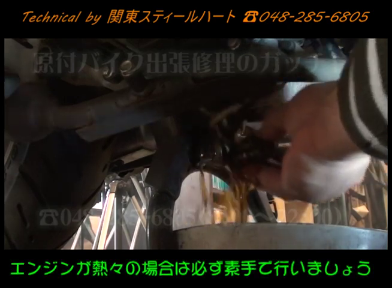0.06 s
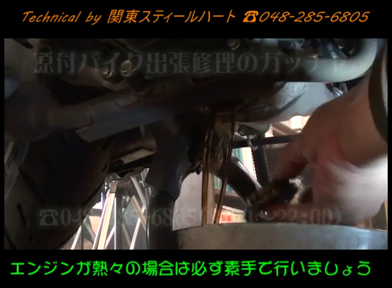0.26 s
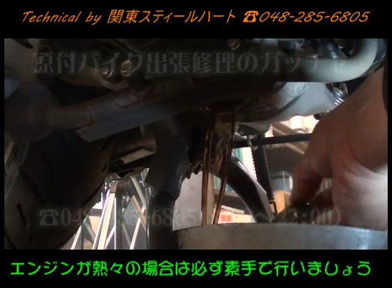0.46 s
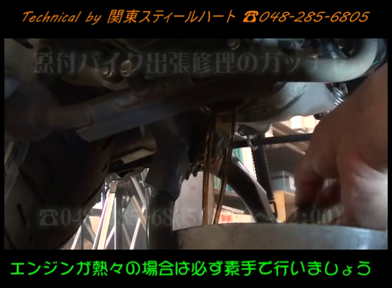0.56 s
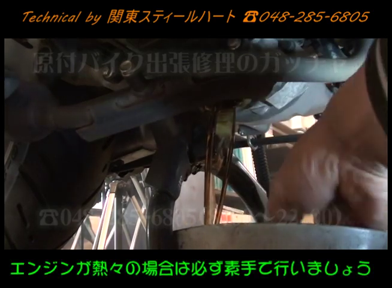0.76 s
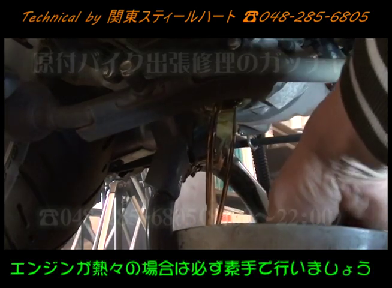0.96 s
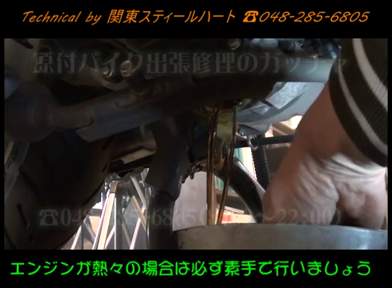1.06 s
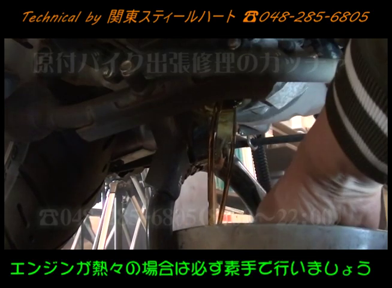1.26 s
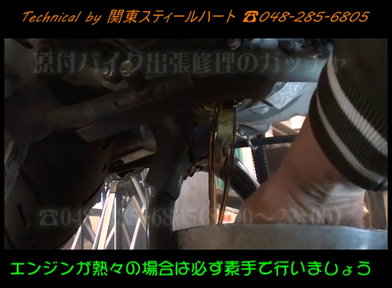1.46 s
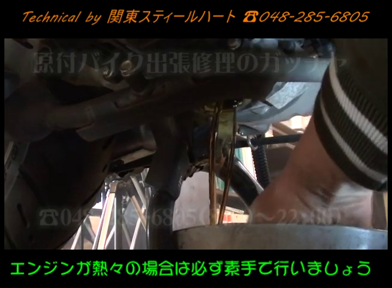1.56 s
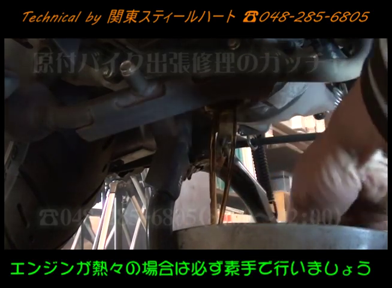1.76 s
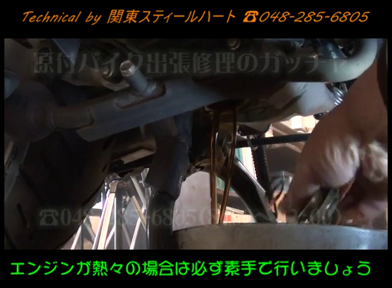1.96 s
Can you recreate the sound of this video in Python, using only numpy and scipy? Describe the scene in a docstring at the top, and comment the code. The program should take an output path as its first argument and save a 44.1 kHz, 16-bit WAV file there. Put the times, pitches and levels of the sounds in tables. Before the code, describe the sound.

A small metal plug clatters into a metal oil bowl after a few light clicks, followed by damped knocks, gritty scraping and a dull bump. The microphone is close, with soft running oil and low workshop rumble behind.

```python
"""A drain plug clicks and squeaks in oily fingers, drops into a metal oil bowl and rattles to rest,
each bounce ringing the bowl and its thin wall. A hand then knocks the plug against the wall,
damping the ring, and drags it along the bottom in a stream of gritty slips; a dull bump follows.
Under it all, oil runs quietly over a low rumble in a small workshop, heard close up through a limiter."""
import sys
import numpy as np
from scipy import signal
from scipy.fft import rfft, irfft
from scipy.io import wavfile
from scipy.ndimage import uniform_filter1d

SR = 44100
rng = np.random.default_rng(int(sys.argv[2]) if len(sys.argv) > 2 else 0)


def output_pcm(signal):
    """Save a mono or channel-first signal as 16-bit PCM at the path in sys.argv[1].

    Samples are clipped to [-1, 1] before scaling.
    """
    pcm = np.clip(np.atleast_2d(signal).T, -1, 1) * 32767
    wavfile.write(sys.argv[1], SR, np.round(pcm).astype(np.int16))


N = 88200
T = np.arange(N) / SR

# Ringing tones of the bowl and its close reflections:
# f/Hz, t60/s, then level/dB when dropped on, knocked and scraped
RING_TONES = [(778.6, 0.064, -11.5, 1, -6.5), (872, 0.095, -15, -4.5, -4), (931, 0.097, -8, -4, -5.5),
              (980.6, .13, -7.5, -6, -8), (1253, 0.067, -33, -2.5, -10), (1371.5, 0.062, -8, 4, 2),
              (1422, 0.17, -5.5, -12, -8.5), (1459, 0.052, 1, -1, -8), (1700, 0.022, 0, -38, -4),
              (1997, 0.065, -19, 3, -7.5), (2205, 0.055, -11.5, -5.5, -11.5), (2378, 0.073, -3.5, -8, -11),
              (3080, 0.016, -6, -29, -3), (3515, 0.16, -9, -7, -21), (3540, 0.28, -14, -39, -24),
              (4090, 0.082, -1, -26, -8.5), (4730, 0.05, -13, -32, -9), (4812, 0.097, -19, -20, -12),
              (4710, .17, -3, -30, -25), (4800, 0.2, -11, -38, -28), (5292, 0.07, -8, -19, -30),
              (5315, 0.059, -7, -38, -38), (5630, 0.043, 8.5, -32, -30), (5795, 0.096, -13, -13, -14.5)]
DROPPED, KNOCKED, SCRAPED = range(3)
# Tone of the thin wall's dense modes under bounces, blows and dragging: f/Hz, level/dB
WALL_RATTLE = [(500, -38), (800, -6.5), (1500, -5), (1800, -11), (2400, -3.5), (2650, -10.5), (3250, -12.5),
               (3600, 1.5), (4400, -1), (4850, 11.5), (5200, 3.5), (5700, 3.5), (6200, 1), (6700, 0),
               (7500, -3), (9300, -16), (10200, -9), (11000, -32), (15000, -47)]
WALL_KNOCK = [(200, -12), (550, -24), (800, 3.5), (2300, -8), (2700, -8), (3300, -1), (4600, -5),
              (5300, -9), (6000, -1), (7200, -5.5), (7900, -16), (8900, -11), (9600, -33), (15000, -34)]
WALL_SCRAPE = [(250, 2), (600, -8.5), (850, 3.5), (1150, 2.5), (1550, -1), (2600, -7.5), (4600, 7.5),
               (5400, -11.5), (6000, 4.5), (8500, 4), (9400, -3.5), (10300, -8.5), (11200, -15),
               (13000, -15), (15500, -43)]
# The plug rattling to rest, and the sizzle on top while the bounces are hard: t/s, level/dB
RATTLE = [(.386, -23), (.392, -10.5), (.41, -17), (.43, -20), (.452, -20), (.47, -26.5), (.49, -27),
          (.53, -35.5), (.58, -40), (.62, -95)]
SIZZLE = [(.386, -15.5), (.41, -40), (.44, -41), (.47, -49), (.52, -74)]
# Plug against wall: t/s, ring/dB, wall/dB, contact cut-off/Hz, ping boost/dB
KNOCKS = [(.9746, -12.5, -3.5, 9900, 5), (1.011, -29, -34, 5000, -0.5), (1.0392, -24.5, -28.5, 9000, -3),
          (1.1805, -29.5, -30, 6000, -8), (1.1919, -16.5, -9.5, 5400, 2), (1.2572, -17.5, -28, 7000, -1),
          (1.2915, -40, -26.5, 12000, -12)]
# Plug dragged over the bottom: t/s, grit/dB, ring/dB
SCRAPE = [(1.121, -55, -64), (1.15, -38, -30), (1.183, -36, -36), (1.205, -39, -36), (1.222, -32.5, -27.5),
          (1.25, -43, -34), (1.275, -48, -51), (1.294, -27.5, -34), (1.311, -49.5, -62),
          (1.329, -40, -31.5), (1.348, -31, -35), (1.365, -36, -39.5), (1.39, -41.5, -36), (1.42, -46, -45),
          (1.44, -58, -51), (1.478, -51, -46), (1.495, -35, -35), (1.509, -31.5, -24.5), (1.52, -35, -34),
          (1.551, -29, -25), (1.564, -36, -37.5), (1.591, -29.5, -21), (1.607, -25, -24),
          (1.628, -30.5, -54), (1.637, -62, -68), (1.66, -84, -83)]
# Light contacts of the plug: t/s, crack/dB, t60/s, ring/Hz, ring/dB
TICKS = [(.0378, -35, 0.021, 4580, -31), (.045, -31, 0.012, 7500, -40), (.062, -50, .03, 6800, -51),
         (.087, -29.5, 0.0067, 4660, -62), (.118, -26, 0.013, 9300, -21), (.131, -34, .02, 7600, -35),
         (.1395, -30.5, 0.029, 8070, -25), (.1435, -25.5, .03, 9900, -39), (.161, -31, 0.015, 4260, -23.5),
         (.163, -50, 0.012, 6500, -21.5), (.1915, -26, 0.019, 2480, -29.5),
         (.2103, -17.5, 0.029, 10750, -25.5), (.2145, -44, 0.018, 7250, -11), (.228, -43, 0.015, 4380, -36),
         (0.2377, -26, 0.027, 7080, -40), (.335, -38.5, 0.028, 1000, -33.5), (.3535, -30, 0.028, 8000, -44),
         (.359, -25, 0.019, 5740, -23.5), (.37, -26.5, 0.022, 7450, -50), (0.3764, -13, 0.029, 8460, -14),
         (.3872, -11.5, 0.032, 6900, -4), (.4065, -16.5, 0.09, 6630, -17), (1.039, -29, 0.021, 6650, -25),
         (1.1355, -30, 0.036, 6400, -28.5), (1.2575, -24, 0.024, 6300, -25.5),
         (1.278, -47, 0.026, 4200, -36), (1.2915, -31, 0.023, 6200, -34), (1.506, -46, 0.028, 4060, -32),
         (1.5565, -32, 0.015, 4330, -20), (1.8935, -29, 0.013, 6300, -30.5), (1.901, -39, 0.015, 6050, -35),
         (1.9105, -51, 0.06, 3630, -41)]
# Skin and sleeve on metal, the plug slipping through oily fingers, dull bumps: t/s, level/dB
SLIDE = [(0, -67), (.05, -46.5), (.1, -53), (.25, -45.5), (.33, -57.5), (.84, -60), (.93, -51.5),
         (1.0, -49.5), (1.6, -55), (1.67, -48.5), (1.76, -46.5), (1.86, -52.5), (1.94, -46), (1.965, -48),
         (1.98, -63)]
RUB = [(.27, -60), (.292, -37.5), (.309, -34), (.318, -66), (.33, -79)]
BUMPS = [(1.897, -34.5), (1.904, -33), (1.924, -42)]
# Partials of the slipping plug's faint squeak: f/Hz, level/dB
SQUEAK = [(4000, -8), (4780, -17), (7450, -11)]
# Swell of the running oil: t/s, level/dB
OIL_FLOW = [(0, -53), (.6, -53), (1.0, -49.5), (1.6, -49), (1.8, -45), (2, -49)]
# EQ curves of the noise layers: f/Hz, level/dB
SIZZLE_COLOUR = [(3000, -30), (5500, -22), (7000, -11), (8500, 5), (10300, 3), (11500, -15), (15000, -20),
                 (16000, -25)]
TICK_COLOUR = [(300, -37), (650, -20), (1000, 15), (1400, -10), (2300, 7), (3400, 0.5), (4400, 4),
               (7500, 7), (10500, -6), (13000, -7), (16000, -18)]
SLIDE_COLOUR = [(300, 7), (1000, 2), (1600, -5), (3000, 1), (3700, -3.5), (4700, -7), (5500, 11.5),
                (5900, -2), (6400, 9.5), (7200, -2), (9200, -1), (11000, -10), (16000, -24)]
RUB_COLOUR = [(1000, -29), (3200, 2), (4000, 3), (4400, 12), (4800, 11), (5600, -3), (7500, 3), (9500, 3),
              (11500, -4), (13400, 1), (16000, -15)]
BUMP_COLOUR = [(70, -15), (130, -0.5), (240, -24), (345, 6), (450, -1), (570, -4), (800, -17), (1200, -14),
               (1600, -18.5), (5000, -38)]
OIL_COLOUR = [(120, 1), (250, 3), (370, 6.5), (550, 5.5), (700, -5.5), (980, -3.5), (1300, -30.5),
              (3000, -42), (8000, -32.5)]
ROOM_COLOUR = [(200, 14), (900, -0.5), (2200, 2.5), (4500, -1), (8000, -7), (15000, 2.5)]
RUMBLE_COLOUR = [(20, -22), (36, -32), (46, -7), (55, 10.5), (70, -7), (95, 0.5), (120, 3.5), (145, -3.5),
                 (195, 1.5), (300, -8), (600, -21), (980, -7.5), (1600, -16), (4000, -19), (8000, -28.5),
                 (15500, -32.5)]
# Stereo width of every noise: f/Hz, side minus mid/dB
WIDTH = [(60, -38), (125, -37), (250, -19), (1000, -12), (2500, -13), (5000, -13.5), (9000, -19.5),
         (13000, -68)]

BOWL_LOW_HZ = 526   # the thin wall radiates little below this
TOUCH_DAMPS_HZ = 3230   # a hand or plug resting on the wall deadens the ring above this
PING_HZ, PING_WIDTH_HZ = 2000, 130   # how strongly this mode rings depends on the spot struck
DROP_S, TICK_ATTACK_S = 0.3768, 0.00031
ROOM_DB, ROOM_T60_S, ROOM_BUILD_S = -16.5, 0.48, 0.0032
LIMIT_DB, RELEASE_DB_PER_S, CUTOFF_HZ = -6.5, 250, 16000


def drop():
    """The plug lands with a damped clank, then chatters in the freely ringing bowl."""
    out = np.zeros((2, N))
    add(out, DROP_S, amp(-11.5) * bowl_ring(DROPPED, t60_scale=0.85, damped_hz=TOUCH_DAMPS_HZ))
    add(out, DROP_S, amp(-8.5) * wall(WALL_KNOCK, t60=0.019))
    bounces = contacts(per_s=1600, spread_db=2.5) * (T > RATTLE[0][0])
    chatter = bounces * level(RATTLE)
    out += through(chatter, wall(WALL_RATTLE, t60=0.044))
    out += through(bounces * level(SIZZLE), wall(SIZZLE_COLOUR, t60=0.045))
    out += amp(-10.5) * through(chatter, bowl_ring(DROPPED))
    # untouched, the tones and the wall ring on in a longer tail
    out += amp(-10) * through(chatter, bowl_ring(DROPPED, t60_scale=2))
    return out + amp(-6) * through(chatter, wall(WALL_RATTLE, t60=0.49, size=32768))


def knocks():
    """Blows on the hand-damped bowl, each with its own brightness."""
    out = np.zeros((2, N))
    for s, ring_db, wall_db, contact_hz, ping_db in KNOCKS:
        high_cut = signal.butter(2, contact_hz, fs=SR, output="sos")
        add(out, s, amp(ring_db) * bowl_ring(KNOCKED, ping_db=ping_db, damped_hz=TOUCH_DAMPS_HZ))
        add(out, s, amp(wall_db) * signal.sosfilt(high_cut, wall(WALL_KNOCK, t60=0.049)))
    return out


def bowl_ring(action, t60_scale=1, ping_db=0, damped_hz=np.inf, size=16384):
    """Tones of the bowl and its close reflections: decaying sines, balanced by how it is played."""
    out = 0
    for k, (hz, t60, *levels_db) in enumerate(RING_TONES):
        ping = np.exp(-((hz - PING_HZ) / PING_WIDTH_HZ) ** 2)
        gain = (-1) ** k * amp(levels_db[action] + ping_db * ping)
        damped_t60 = t60 * t60_scale / (1 + (hz / damped_hz) ** 4)
        out += gain * np.sin(2 * np.pi * hz * T[:size]) * fade(damped_t60, size)
    return low_cut(out, BOWL_LOW_HZ)


def wall(colour, t60, size=8192):
    """A metallic wash of close wall modes; t60 holds at 4 kHz, and higher octaves die sooner."""
    spectrum, out = rfft(noise(colour, size)), 0
    hz = np.arange(size // 2 + 1) * SR / size
    octave = np.log2(np.clip(hz, 500, 16000) / 4000)
    for k in range(-3, 3):
        band = irfft(spectrum * np.maximum(1 - abs(octave - k), 0), size)
        out += band * fade(t60 * 2 ** (-0.45 * k), size)
    return low_cut(out, BOWL_LOW_HZ)


def scrape():
    """Dense slips at three points of the plug drive the wall and a choked bowl ring."""
    s, grit_db, ring_db = np.transpose(SCRAPE)
    grit, push = (amp(np.interp(T, s, db)) * (T > s[0]) for db in (grit_db, ring_db))
    slips = [contacts(per_s=700, spread_db=2) / np.sqrt(3) for _ in range(3)]
    rasp = sum(through(grit * slip, wall(WALL_SCRAPE, t60=0.03)) for slip in slips)
    return rasp + through(push * sum(slips), bowl_ring(SCRAPED, t60_scale=0.42))


def ticks(size=4096):
    """Each light contact is a short crack with a brief ring that depends on the grip."""
    out = np.zeros((2, N))
    bowl = bowl_ring(DROPPED, damped_hz=TOUCH_DAMPS_HZ)
    for s, db, t60, ring_hz, ring_db in TICKS:
        crack = amp(db) * noise(TICK_COLOUR, size)
        ring = amp(ring_db) * noise(peak(ring_hz, octaves=0.12, down_db=6), size)
        envelope = (1 - np.exp(-T[:size] / TICK_ATTACK_S)) * fade(t60, size)
        add(out, s, (crack + ring) * envelope)
        add(out, s, amp(db - 15) * bowl)   # the contact also stirs the bowl
    return low_cut(out, hz=345)


def hand():
    """Skin and sleeve brush the metal, the oily plug squeaks, and the hand lifts with a dull bump."""
    out = level(SLIDE) * through(contacts(per_s=2500, spread_db=5.5), wall(SLIDE_COLOUR, t60=0.024))
    squeak = sum(amp(db) * noise(peak(hz, octaves=0.012, down_db=8)) for hz, db in SQUEAK)
    out += level(RUB) * (noise(RUB_COLOUR) + squeak) * (T > RUB[0][0])
    for s, db in BUMPS:
        add(out, s, amp(db) * noise(BUMP_COLOUR, size=8192) * fade(t60=0.19, size=8192))
    return out


def workshop(x):
    """Diffuse reflections that build up quickly and die away."""
    build = 1 - np.exp(-(T / ROOM_BUILD_S) ** 2)
    return amp(ROOM_DB) * through(x, noise(ROOM_COLOUR) * fade(ROOM_T60_S) * build)


def oil():
    """Running oil: a soft, dark noise that swells a little."""
    return level(OIL_FLOW) * noise(OIL_COLOUR)


def rumble():
    """A steady, low bed of room tone."""
    return amp(-45.5) * low_cut(noise(RUMBLE_COLOUR), hz=36.3)


def contacts(per_s, spread_db):
    """Random tiny impacts of uneven size, rms 1."""
    sizes = amp(spread_db * np.minimum(rng.exponential(1, N), 3)) * rng.choice([-1, 1], N)
    return unit(sizes * (rng.random(N) < per_s / SR))


def noise(colour, size=N):
    """Stereo noise of a given colour, rms 1."""
    hz = np.maximum(np.arange(size // 2 + 1) * SR / size, 1)
    mid, side = np.exp(2j * np.pi * rng.random((2, len(hz)))) * at_hz(colour, hz)
    side = side * at_hz(WIDTH, hz)
    return unit(irfft([mid + side, mid - side], size))


def peak(hz, octaves, down_db):
    """A bell EQ curve, down_db lower at that many octaves either side of hz."""
    return [(hz * 2 ** (k * octaves), -down_db * k * k) for k in range(-3, 4)]


def through(x, response):
    """Play x through a response scaled to unit energy."""
    response = np.atleast_2d(response)
    energy = np.sum(response ** 2) / len(response)
    return signal.fftconvolve(np.atleast_2d(x), response / np.sqrt(energy), axes=1)[:, :N]


def add(out, s, sound):
    """Mix a sound in at time s."""
    i = int(s * SR)
    out[:, i:i + sound.shape[-1]] += sound[..., :N - i]


def amp(db):
    """Decibels to gain."""
    return 10 ** (np.asarray(db) / 20)


def unit(x):
    """Scale to rms 1."""
    return x / np.sqrt(np.mean(x ** 2) + 1e-20)


def level(curve):
    """A fader ride through points of t/s, level/dB."""
    return amp(np.interp(T, *np.transpose(curve)))


def at_hz(points, hz):
    """Gain at hz on an EQ curve of f/Hz, level/dB."""
    f, db = np.transpose(points)
    return amp(np.interp(np.log(hz), np.log(f), db))


def fade(t60, size=N):
    """Exponential decay, 60 dB in t60 seconds."""
    return np.exp(-np.log(1000) * T[:size] / t60)


def low_cut(x, hz):
    """Third-order high-pass."""
    return signal.sosfilt(signal.butter(3, hz, "high", fs=SR, output="sos"), x)


def scene():
    """Bowl and hand in the room, over running oil and a low rumble."""
    near = drop() + knocks() + ticks() + scrape() + hand()
    return near + workshop(near) + oil() + rumble()


def record(dry):
    """A fast limiter ducks everything after the loudest blows; the top is cut."""
    peak_db = 20 * np.log10(abs(dry).max(axis=0) + 1e-9)
    over_db = np.maximum(peak_db - LIMIT_DB, 0)
    duck_db = np.maximum.accumulate(over_db + RELEASE_DB_PER_S * T) - RELEASE_DB_PER_S * T
    limited = dry * amp(-uniform_filter1d(duck_db, size=24))
    high_cut = signal.cheby2(16, 70, CUTOFF_HZ + 700, fs=SR, output="sos")
    return signal.sosfilt(high_cut, limited)


dry = scene()
out = record(dry)
output_pcm(out)
```